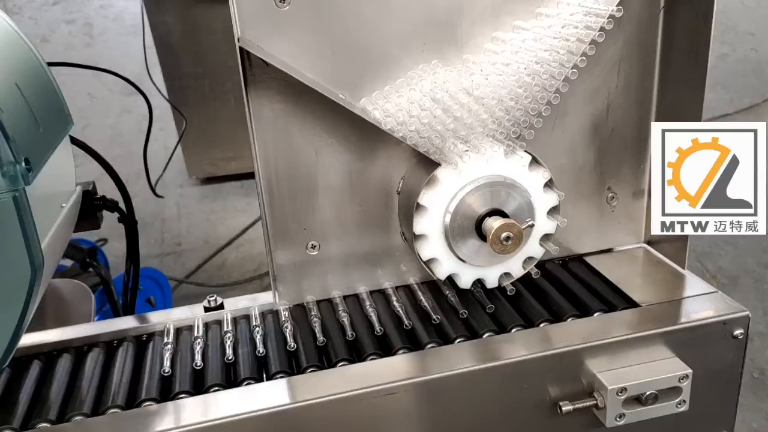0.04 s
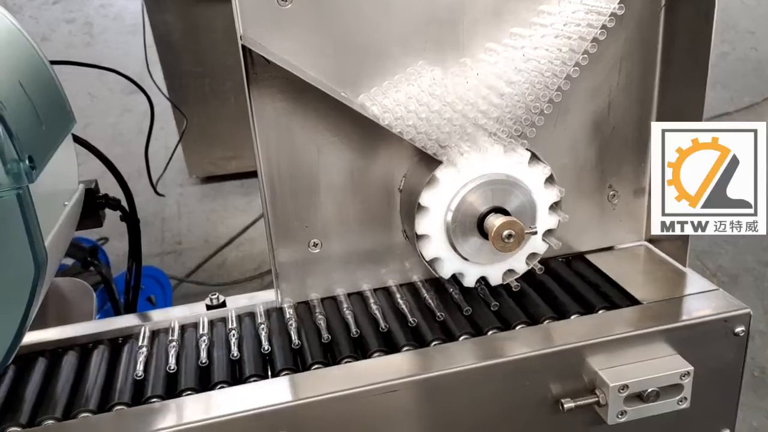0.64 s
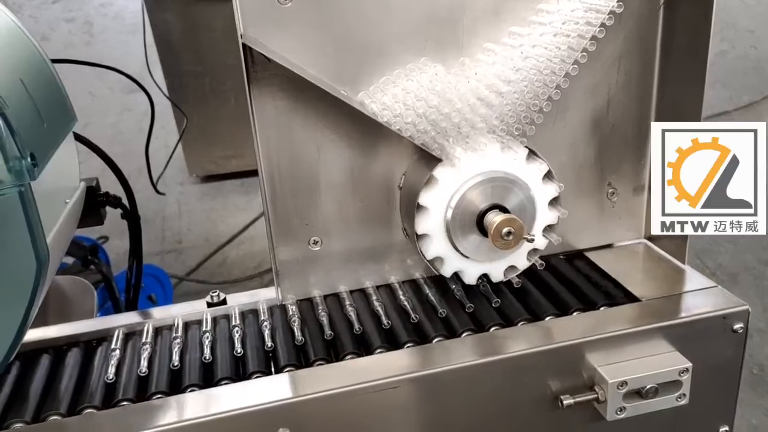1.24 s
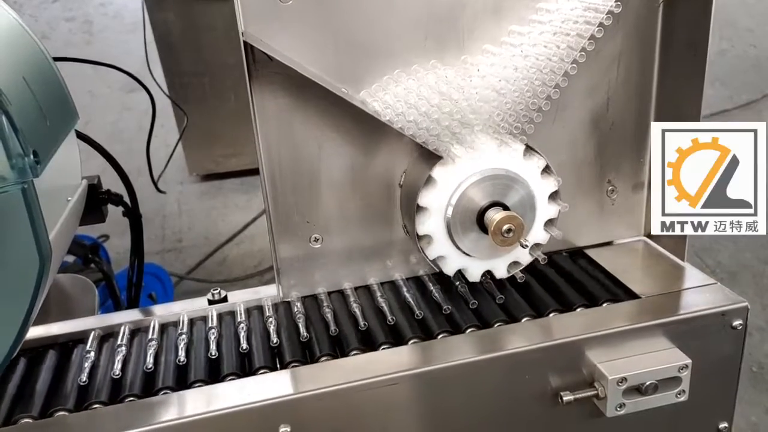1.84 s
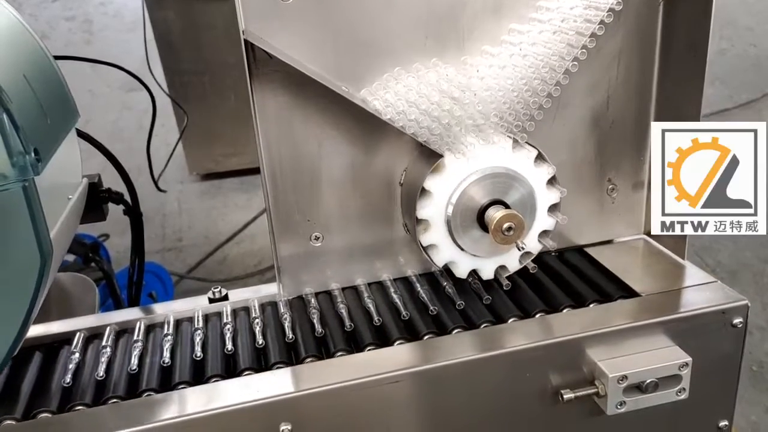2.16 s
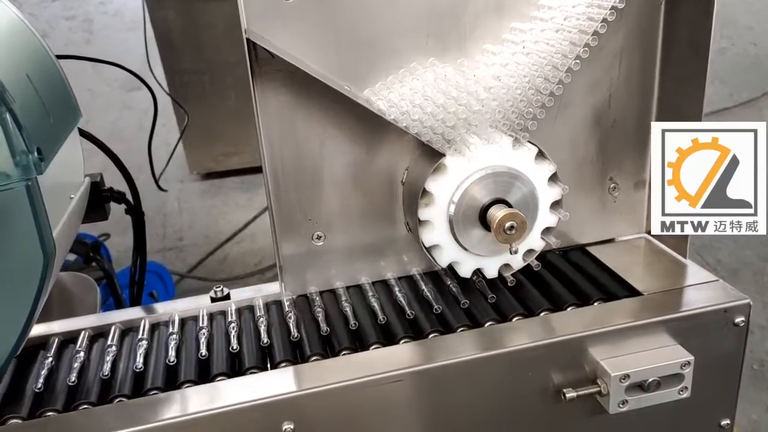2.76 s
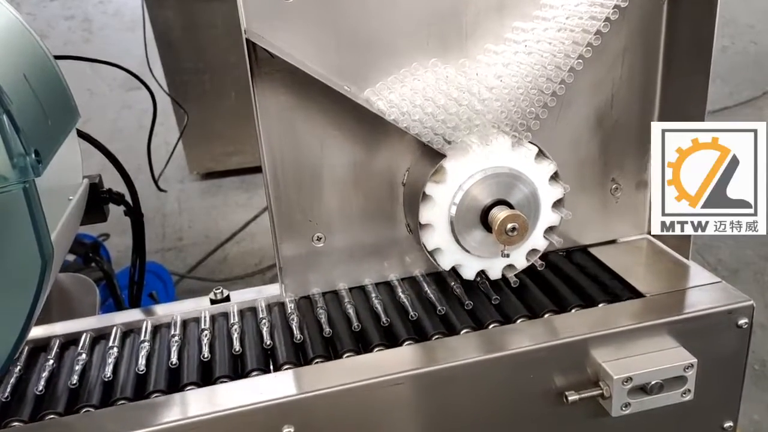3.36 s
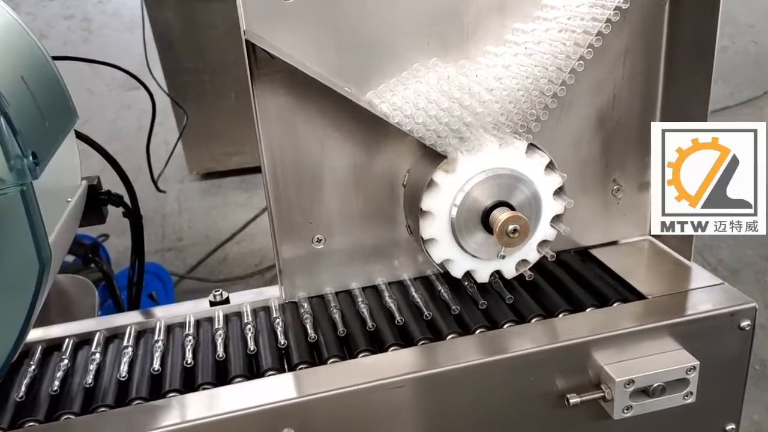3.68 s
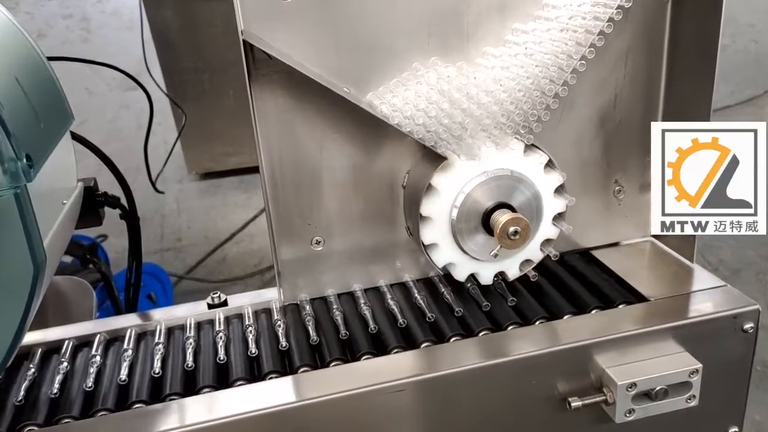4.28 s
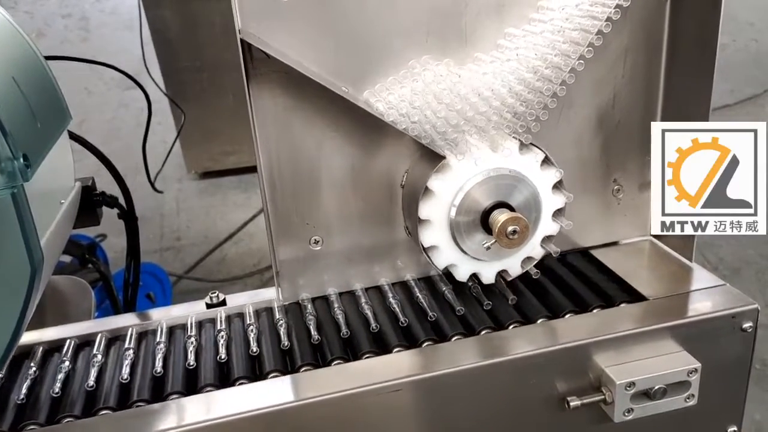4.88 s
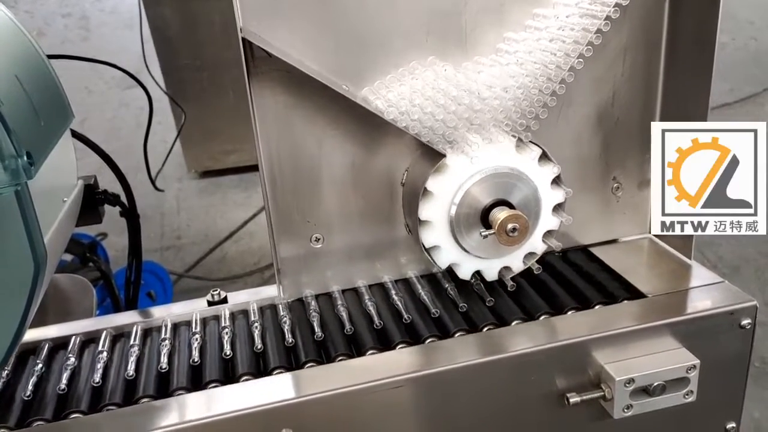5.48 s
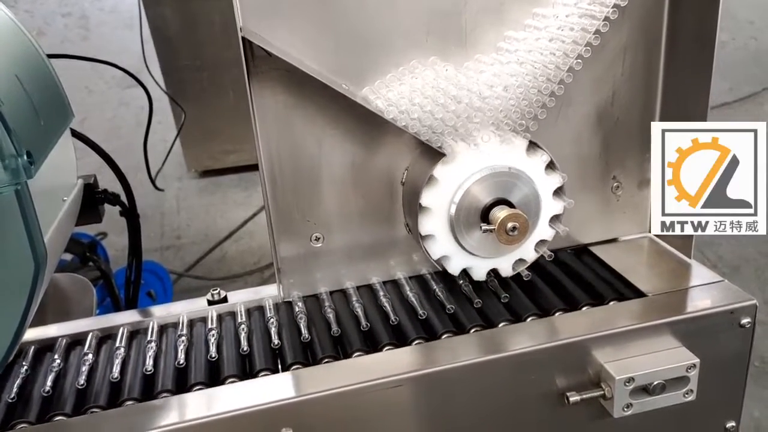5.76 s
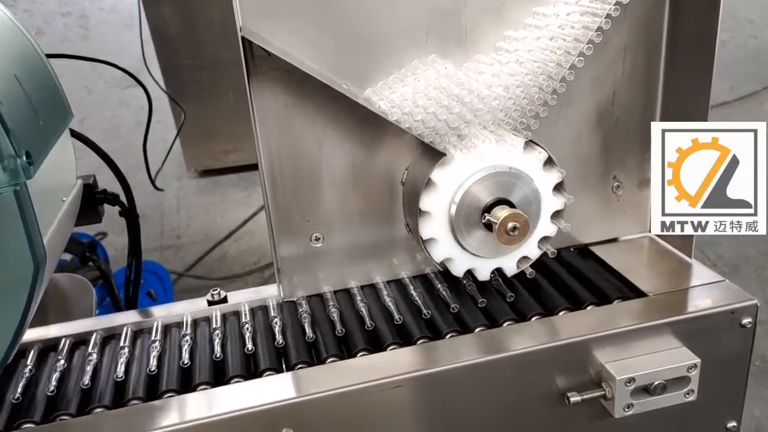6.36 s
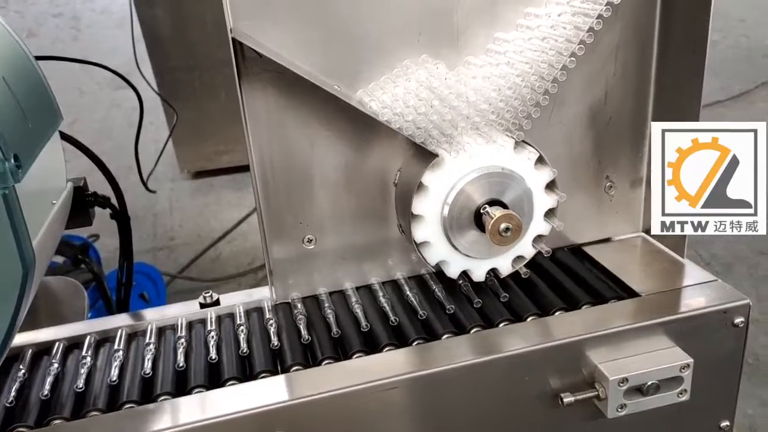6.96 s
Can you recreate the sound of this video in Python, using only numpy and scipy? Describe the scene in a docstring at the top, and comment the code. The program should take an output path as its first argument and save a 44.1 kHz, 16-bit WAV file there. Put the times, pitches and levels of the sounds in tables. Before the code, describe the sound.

A steady factory machine hum and whir fades in, with a few brief air pops on the microphone. Small glass bottles then drop from a feed wheel onto rollers, three or four a second, each with a bright, high clink and quick bounces. Between drops, the bottles piled in a steel bin knock and rattle, and now and then a steel rail rings. The sound is close and continues to the end.

```python
"""A factory hum and whir fades in with a few pops of air on the microphone; then glass starts to clink.
A labeling machine's notched wheel drops small bottles onto rollers, three or four a second.
Each one clinks, bounces and may ring the steel guide rail. Every drop, and every knock among
the bottles piled in the steel hopper (the supply bin), sets that pile rattling until it settles.
The motor runs evenly, but an automatic volume control turns everything down under each loud clink."""
import sys
import numpy as np
from scipy import signal
from scipy.fft import rfft, irfft, next_fast_len
from scipy.io import wavfile
from scipy.ndimage import map_coordinates

SR = 44100
rng = np.random.default_rng(int(sys.argv[2]) if len(sys.argv) > 2 else 0)


def log_audio(samples):
    """Write samples as a 16-bit WAV file to the path given in sys.argv[1]."""
    # one column per channel
    frames = np.atleast_2d(samples).T
    # limit to full scale, then quantise
    limited = np.clip(frames, -1, 1)
    pcm = np.round(limited * 32767).astype(np.int16)
    wavfile.write(sys.argv[1], SR, pcm)


N = 314433
SIDES = np.array([[1], [-1]])  # plus for the left channel, minus for the right


def amp(db):
    """Turn decibels into a number to multiply by."""
    return 10 ** (np.asarray(db) / 20)


def unit(x):
    """Scale a sound to an average (rms) strength of 1."""
    return x / np.sqrt(np.mean(x ** 2) + 1e-20)


def along(points, hz):
    """Read between (Hz, value) points on a logarithmic frequency scale."""
    point_hz, values = np.transpose(points)
    return np.interp(np.log(hz + 1), np.log(point_hz + 1), values)


def curve(rows):
    """Join (seconds, value) points with straight lines, one value per sample."""
    return np.interp(np.arange(N) / SR, *np.transpose(rows))


def wobble(per_s):
    """A smooth curve through per_s random values a second."""
    points = rng.standard_normal(int(N * per_s / SR) + 4)
    return map_coordinates(points, [np.arange(N) * per_s / SR])


def filtered(x, response):
    """Multiply each frequency in a sound by response(hz)."""
    size = x.shape[-1]
    padded = next_fast_len(size + 2048)
    return irfft(rfft(x, padded) * response(np.fft.rfftfreq(padded, 1 / SR)), padded)[..., :size]


def coloured(x, tone):
    """Shape a sound's tone with (Hz, dB) points."""
    return filtered(x, lambda hz: amp(along(tone, hz)))


def burst(t60, size):
    """Stereo noise that dies away; t60 is the fade time, the seconds it takes to fall 60 dB."""
    noise = rng.standard_normal((2, size)) * amp(-60 * np.arange(size) / SR / t60)
    return noise / np.linalg.norm(noise, axis=1, keepdims=True)


def rise(rise_s, size):
    """A soft start that climbs from 0 towards 1."""
    return 1 - np.exp(-np.arange(size) / SR / rise_s)


def scrape(t60, rise_s, size):
    """A scraping contact: noise that builds up, then dies away."""
    return burst(t60, size) * rise(rise_s, size)


def ringing(notes, scatter_db, size):
    """A struck object's fading notes, from (Hz, dB, fade time) rows; every blow mixes them anew."""
    t = np.arange(size) / SR
    return sum(amp(db + rng.normal(0, scatter_db) - 60 * t / t60) * np.sin(2 * np.pi * hz * t)
               for hz, db, t60 in notes)


def resonance(hz, note_hz, width_hz):
    """How steel answers each frequency: most strongly at its own note."""
    return 1j * hz * width_hz / (note_hz ** 2 - hz ** 2 + 1j * hz * width_hz)


def echoed(x, t60, wet_db):
    """Add a smooth tail of echoes, at level wet_db."""
    tail = signal.fftconvolve(np.atleast_2d(x), burst(t60, SR // 3), axes=1)
    return x + amp(wet_db) * tail[:, :x.shape[-1]]


def add(track, start_s, sound):
    """Mix a sound into a track at the given time."""
    part = track[:, round(start_s * SR):][:, :sound.shape[1]]
    part += sound[:, :part.shape[1]]


# How loud the conveyor rumbles. Each row: time in seconds, level in dB.
RUMBLE_LEVELS = [(0.4, -50), (1.7, -49.5), (2.5, -49.5), (3.3, -47), (4.18, -46.5), (4.29, -41),
                 (4.36, -47), (4.8, -47), (5.6, -47.5), (7.1, -48)]

def rumble(frame_hz=331.3, width_hz=60.3, throb_db=1.7):
    """The rolling chain throbs in the conveyor's frame, almost alike on the left and right."""
    noise = rng.standard_normal(N) + 0.34 * rng.standard_normal((2, N))
    body = filtered(noise, lambda hz: np.exp(-((hz - frame_hz) / width_hz) ** 2 / 2))
    return unit(body * amp(throb_db * wobble(30))) * amp(curve(RUMBLE_LEVELS))


# The tone of the whir. Each row: frequency in Hz, level in dB.
WHIR_TONE = [(25, -25), (60, -14), (100, -3), (220, -7), (350, -3.5), (470, -5.5), (950, -6), (1300, -2.5),
             (1550, -3.5), (2100, -1), (2800, -4), (3500, -16), (6000, -22.5), (16000, -74)]
# How alike its two sides are. Each row: frequency in Hz, likeness (1 means the same).
WHIR_LIKENESS = [(50, 0.87), (250, 1), (500, 0.4), (1000, 0.13), (4000, 0.22)]

def whir(level_db=-39, grain_db=1.7):
    """The chain and rollers make an even, slightly grainy rush."""
    def split(hz):
        angle = np.arccos(np.clip(along(WHIR_LIKENESS, hz), -1, 1)) / 2
        return np.array([np.cos(angle), np.sin(angle)])

    noise = coloured(rng.standard_normal((2, N)), WHIR_TONE)
    shared, opposite = filtered(noise, split)
    return unit(shared + SIDES * opposite) * amp(level_db) * amp(grain_db * wobble(80))


# The notes of the motor and gears. Each row: pitch in Hz, level in dB.
MOTOR_NOTES = [(120, -68.5), (180, -52.5), (200, -65.5), (300, -56.5), (360, -53.5), (400, -61),
               (540, -57.5), (720, -60.5), (1238, -62.5), (1272, -58), (1641, -66), (2336, -62),
               (2905, -63.5), (2940, -65), (3454, -70)]

def motor_hum(level_db=5, waver_db=1.2, flutter_db=1.1, drift_rad=0.25):
    """Under a steady load, the motor and gears hold notes that waver only a little."""
    out, t = np.zeros((2, N)), np.arange(N) / SR
    for hz, db in MOTOR_NOTES:
        phase = 2 * np.pi * (hz * t + rng.random()) + drift_rad * wobble(6)
        apart = SIDES * min(hz / 1500, np.pi / 4)  # short waves reach the two sides out of step
        strength = amp(db + level_db + waver_db * wobble(4.03) + flutter_db * wobble(35))
        out += strength * np.sqrt(2) * np.sin(phase + apart)
    return out


# Puffs of air on the microphone. Each row: start in seconds, level in dB.
AIR_POPS = [(0.1815, -9.5), (0.1921, -19.5), (0.3435, -8), (1.0286, 8.5)]

def air_pops(fall_s=0.0022, rise_s=0.00008, left_db=-24, low_cut_hz=76):
    """Air hits the right side of the microphone: the pressure jumps, then swings back below zero."""
    out, size = np.zeros((2, N)), SR // 30
    fall = np.arange(size) / SR / fall_s
    push = (1 - fall) * np.exp(-fall) * rise(rise_s, size)
    for start_s, db in AIR_POPS:
        add(out, start_s, amp([[left_db], [0]]) * amp(db) * push)
    return filtered(out, lambda hz: hz ** 2 / (hz ** 2 + low_cut_hz ** 2))


def stirring(rest_db=-52, knock_db=-14.5, drop_db=-31, drop_settle_s=0.088, restless_db=2):
    """How hard the pile moves: every knock and drop stirs it, then it settles to a faint patter."""
    power, t = np.full((1, N), amp(rest_db) ** 2), np.arange(SR // 2) / SR
    jolts = [(start_s, db + knock_db, settle_s) for start_s, db, _, settle_s, *_ in PILE_KNOCKS]
    jolts += [(start_s, db + drop_db, drop_settle_s) for start_s, db, *_ in BOTTLE_DROPS]
    for start_s, db, settle_s in jolts:
        motion = amp(db) * rise(0.0077, len(t)) * np.exp(-t / settle_s)
        add(power, start_s, motion[None] ** 2)
    return np.sqrt(power[0]) * amp(restless_db * wobble(40))


# The tone of glass against the steel hopper. Each row: frequency in Hz, level in dB.
HOPPER_TONE = [(200, -16), (900, -5.5), (1500, 1.5), (2100, 8), (3200, 2.5), (5000, -3), (5700, 2),
               (7100, -1), (7750, 12.3), (8500, 1), (10000, -15), (13800, -32.5), (14900, -12),
               (16000, -35)]

def pile_patter(level_db=5.5, touches_per_s=700, spread_db=4, touch_s=0.0019):
    """The wheel stirs the pile: a dense patter of tiny, soft touches of glass."""
    happens = rng.random(N) < touches_per_s / SR
    touches = happens * amp(spread_db * np.clip(rng.standard_normal(N), -2, 2))
    rubbing = signal.lfilter([1], [1, -np.exp(-1 / (SR * touch_s))], touches)  # each touch dies away
    noise = rng.standard_normal((2, N)) + 0.77 * rng.standard_normal(N)  # partly alike on both sides
    patter = coloured(rubbing * noise, HOPPER_TONE)
    softened = coloured(patter, [(8800, 0), (10500, -3.5)])
    return echoed(unit(softened) * stirring() * amp(level_db), t60=0.28, wet_db=-3.5)


# The notes of the hopper's walls. Each row: pitch in Hz, width in Hz, level in dB.
WALL_NOTES = [(800, 84, 10.5), (1220, 106, 2), (2320, 1300, -5), (3495, 42, 3.5), (3880, 140, 3),
              (4390, 190, -0.5), (5620, 180, -1), (6440, 290, 0.5)]

def hopper_walls(inside, ring_db=-2):
    """The hopper's sheet steel rings along with whatever moves inside it."""
    def steel(hz):
        return sum(amp(db) * resonance(hz, note_hz, width_hz) for note_hz, width_hz, db in WALL_NOTES)

    return filtered(inside, lambda hz: 1 + amp(ring_db) * steel(hz))


def chinks(size, count=4, spread_s=0.022, low_hz=7260, high_hz=8600, t60=0.022):
    """Jostled neighbours chink one after another, each at its own pitch; later ones are softer."""
    out, t = np.zeros((2, size)), np.arange(size) / SR
    for delay, pitch, right_phase in rng.random((count, 3)):
        hz = low_hz + pitch * (high_hz - low_hz)
        note = np.sin(2 * np.pi * hz * t + np.array([[0], [right_phase]]))
        add(out, delay * spread_s, note * amp(-60 * t / t60) * np.exp(-delay))
    return out


# The hollow part of a knock. Each row: multiple of its pitch, level in dB, fade time in seconds.
CLACK_NOTES = [(.86, -2, 0.055), (1, 1.5, 0.065), (1.14, 2, 0.037), (1.45, -5.5, .045), (2.6, -6.5, 0.043)]

def clack(note_hz, size, rise_s=0.004, detune=0.0402):
    """A few short, hollow notes whose pitch depends on where the hopper is struck."""
    notes = [(note_hz * ratio * (1 + rng.normal(0, detune)), db, t60) for ratio, db, t60 in CLACK_NOTES]
    ring = ringing(notes, scatter_db=5, size=size) * rise(rise_s, size)
    ring = echoed(ring, t60=0.025, wet_db=-3)
    return ring / ring[:, :SR // 100].std()  # strength 1 over the first 10 ms


# Bottles knocking in the pile. Each row: start in seconds, level in dB, glassy treble in dB,
# settling time in seconds, rise time in seconds, hollow pitch in Hz, steely edge in dB.
PILE_KNOCKS = [(0.5417, -24, -5, 0.035, .002, 2285, 1), (.576, -27, -15, 0.022, .002, 2040, -5),
               (.6405, -21.5, -9.5, 0.034, .001, 2245, -11), (.6973, -24, 0, 0.022, .001, 2470, -2),
               (.9522, -27, -24, 0.045, .005, 2340, -7), (1.1885, -23.5, -3, 0.039, 0.0022, 2340, 11),
               (1.2216, -18.5, -5, 0.017, 0.0012, 2057, 7), (1.2855, -24.5, -25, 0.0092, 0.0008, 1985, -6),
               (1.3369, -18, -5.5, 0.022, 0.0038, 2490, 3), (1.3823, -18.5, -3, 0.025, .001, 2415, 4),
               (1.5337, -24, -5, 0.022, 0.00089, 2325, 0), (1.6, -21.5, -15, 0.033, .002, 2480, -10),
               (1.8734, -22, 1, 0.033, 0.0012, 2240, 2), (2.1929, -24, -3, 0.025, 0.0026, 2170, -3),
               (2.2194, -23.5, -5, 0.033, .002, 2300, -2), (2.2767, -19.5, -11, 0.012, 0.0054, 2080, -9),
               (2.4808, -25, -10, 0.044, 0.011, 2266, 0), (2.815, -23.5, -5, 0.042, 0.00048, 2150, -5),
               (3.0495, -23.5, -28, 0.06, .002, 2390, -3), (3.1767, -24.5, -8, 0.014, 0.0013, 2084, -3),
               (3.4808, -18.5, -13.5, 0.015, 0.00066, 1870, 4), (3.56, -20.5, -2, 0.07, .004, 2580, 5.5),
               (3.687, -22.5, -32, .006, .0005, 2595, 2), (3.977, -20.5, -11, 0.066, 0.0054, 1890, -12),
               (4.08, -15.5, -6, 0.028, .005, 2080, 8), (4.2492, -27.5, -13, .09, 0.0012, 2230, 3),
               (4.5206, -18, -4, 0.032, 0.0036, 1880, -1), (4.6175, -20, -8, 0.055, .001, 2475, 4),
               (4.641, -25, 10, .03, 0.0051, 2380, 8), (4.6643, -17.5, -6, 0.034, 0.0034, 2513, 6),
               (4.781, -18, -16, 0.0046, 0.00073, 1997, -5), (4.8254, -28, 1, 0.035, .0007, 2350, 6),
               (4.8688, -17, -6, 0.016, 0.00085, 2610, 1), (4.9263, -22, -9, 0.029, 0.00072, 2260, 7),
               (5.08, -22, -12, .056, .004, 2265, -1), (5.1602, -23, -7, 0.042, .003, 2386, 1),
               (5.274, -29.5, -7, 0.011, 0.00092, 2770, -7), (5.306, -30, -7, .017, .001, 2560, 0),
               (5.4517, -22, -12, 0.029, .0005, 2374, 4), (5.518, -25, -23, .009, 0.0024, 2000, -7),
               (5.5887, -26, -11, 0.017, 0.0028, 2310, 2), (5.8752, -28.5, -7, 0.0095, 0.00092, 2034, 0),
               (6.1873, -26.5, -5, 0.031, .002, 2170, -4), (6.2362, -21.5, 7, 0.061, 0.0011, 2270, 8),
               (6.2766, -20.5, 1, 0.058, 0.0011, 2280, 3), (6.5455, -30, -19, 0.019, .005, 1910, -10),
               (6.67, -24.5, -5, 0.066, 0.013, 2576, -3), (6.8159, -19.5, 4.5, 0.025, .003, 1893, 3),
               (6.875, -27, -14, 0.02, .004, 2150, -7), (6.9276, -23, -9, 0.042, .001, 1950, -4),
               (7.063, -28.5, -32, 0.021, .003, 2080, -3), (7.109, -26, -25, 0.022, .004, 2026, -7)]

def knocks(level_db=-7.5, uneven_db=3, clack_db=-6.5, chink_db=-1):
    """A bottle slips in the pile: a hollow, scraping knock and a clatter; harder knocks are brighter."""
    out, size = np.zeros((2, N)), SR // 5
    usual_db = np.mean([db for _, db, *_ in PILE_KNOCKS])
    for start_s, db, treble_db, settle_s, rise_s, note_hz, edge_db in PILE_KNOCKS:
        jolts = amp(uneven_db * np.repeat(rng.uniform(-1.7, 1.7, size // 60), 60))
        clatter = scrape(t60=0.046 + settle_s, rise_s=0.0026 + rise_s, size=size) * jolts
        hit = coloured(scrape(t60=0.022, rise_s=rise_s, size=size) + clatter, HOPPER_TONE)
        hit = hit / hit[:, :SR // 100].std() + amp(chink_db) * chinks(size)
        glassy_db = 0.64 * (treble_db + 12)
        splash_db = 6 + db - usual_db
        tone = [(4800, 0), (5700, edge_db), (6600, edge_db), (7200, glassy_db / 2),
                (8000, glassy_db), (9000, glassy_db), (11000, glassy_db + splash_db)]
        knock = coloured(hit, tone) + amp(clack_db) * clack(note_hz, size)
        add(out, start_s, amp(db + level_db) * knock)
    return echoed(out, t60=0.11, wet_db=-4.5)


# Light touches on steel. Each row: start in seconds, level in dB, pitch in Hz.
STEEL_TINGS = [(2.927, -32, 4020), (3.022, -28, 3461), (3.092, -35, 3520), (4.38, -32, 3450),
               (5.735, -33, 3467), (5.79, -32.5, 3100), (6.335, -28, 3494), (7.06, -35, 3628)]

def tings(level_db=-7, t60=0.12, width_hz=80, grit_db=-11):
    """A bottle nudges a steel part: a gritty touch with a short note in it."""
    out, size = np.zeros((2, N)), SR // 6
    for start_s, db, note_hz in STEEL_TINGS:
        nudge = scrape(t60, rise_s=0.001, size=size)
        note = filtered(nudge, lambda hz: resonance(hz, note_hz, width_hz))
        grit = coloured(burst(t60=0.015, size=size), CONTACT_TONE)
        ting = note / np.linalg.norm(note[0]) + amp(grit_db) * grit
        add(out, start_s, amp(db + level_db) * ting / ting[:, :SR // 100].std())
    return out


# Two bottles touching. Each row: start in seconds, level in dB, pitch in Hz.
GLASS_TICKS = [(0.8393, -17, 7700), (2.817, -20, 7850), (2.83, -18, 8000), (3.351, -29, 8100),
               (3.468, -24, 8000), (3.851, -29, 8030), (4.518, -21, 8200), (4.871, -12.5, 8360),
               (5.452, -27, 7850), (5.466, -19, 8220), (5.613, -28, 8400), (5.642, -26, 7800),
               (5.793, -20, 7950), (6.036, -28, 8030), (6.19, -19, 8000), (6.819, -11, 8000),
               (6.97, -18, 7600), (7.029, -33, 7800)]

def ticks(level_db=-8, t60=0.052, crack_db=15):
    """Wedged in the pile, a bottle gives only a dry crack and a choked ring."""
    out, size = np.zeros((2, N)), SR // 10
    for start_s, db, hz in GLASS_TICKS:
        ring = ringing([(hz, 0, t60)], scatter_db=0.5, size=size)
        tick = ring + amp(crack_db) * coloured(burst(t60=0.012, size=size), CONTACT_TONE)
        add(out, start_s, amp(db + level_db) * tick / tick[:, :SR // 300].std())
    return echoed(out, t60=0.066, wet_db=-2)


# Blows on the steel guide rail. Each row: start in seconds, level in dB.
RAIL_BLOWS = [(.553, -33), (0.6977, -16.5), (1.999, -14), (2.644, -22.5), (3.57, -24), (4.09, -23),
              (4.62, -21), (5.324, -16.5), (6.248, -21)]
# The rail's notes. Each row: pitch in Hz, level in dB, fade time in seconds.
RAIL_NOTES = [(3994, -10, 0.2), (5600, -1, 0.059), (5720, -0.5, 0.16), (6580, -4, 0.11), (9370, -9, .04),
              (11670, -12, 0.045), (13280, -18, .045)]

def guide_rail(level_db=-9, rattle_s=0.005, rattle_gain=0.62):
    """A bottle's neck flips against the loose rail in a quick double touch, and the rail buzzes."""
    out = np.zeros((2, N))
    for start_s, db in RAIL_BLOWS:
        ring = echoed(ringing(RAIL_NOTES, scatter_db=2.5, size=SR // 4), t60=0.05, wet_db=-8)
        add(ring, rattle_s * (0.5 + rng.random()), rattle_gain * ring)
        add(out, start_s, amp(db + level_db) * ring / ring[:, :SR // 100].std())
    buzz = 0.8 + 0.6 * wobble(350)
    return out * buzz


# The tone of glass sliding on the wheel. Each row: frequency in Hz, level in dB.
SLIDE_TONE = [(2000, -16.5), (6800, -5.5), (7750, 0.5), (8600, -14), (10000, -26), (14800, -40),
              (16000, -50)]

def slides(level_db=-24, swell_s=0.011, uneven_db=4):
    """Just before it lands, each bottle grates over the edge of its notch."""
    grip, size = np.zeros((1, N)), SR // 12
    swell = np.exp(-np.arange(size)[::-1] / SR / swell_s)
    for landing_s, db, *_ in BOTTLE_DROPS:
        add(grip, landing_s - size / SR, amp(db + level_db) * swell[None])
    grating = unit(coloured(rng.standard_normal((2, N)), SLIDE_TONE))
    return grating * grip * amp(uneven_db * wobble(250))


# Bottles landing on the rollers. Each row: start in seconds, level in dB, pitch in Hz,
# lean to the left in dB, boost of the lowest note in dB, hardness in dB, free ringing in seconds,
# then for each of two bounces: time in the air in seconds, dB below the landing.
BOTTLE_DROPS = [(0.3627, -7, 7670, 2.5, -8, 1.5, 0.006, 0.023, 7, .0255, .5),
                (.457, -13.5, 7620, 3.5, -8, 2, 0.013, .023, 18, .015, 17),
                (.6883, -18, 7820, 7, 12, 5, 0.0035, .012, 3, .016, 8),
                (1.023, -6.5, 7720, 5.5, -2, 2.5, 0.011, 0.067, 4, .055, 14),
                (1.3461, -2, 7780, 2.5, -4, 0, .011, 0.039, 23, .029, 21),
                (1.6725, -5, 7764, 6, -3, -1.5, 0.03, 0.052, 0.5, .038, 13),
                (1.989, -6.5, 7650, 11, 15, -2, .0069, 0.052, 10, .022, 25),
                (2.2156, -13, 7730, 4, -7, 4, .0042, 0.02, 9, .015, 22),
                (2.3181, -1.5, 7790, 4, -15, 0, 0.007, 0.028, 6.5, .034, 7),
                (2.634, -13, 7690, 8, 9, 5.5, .014, 0.063, 15, .025, 39),
                (2.969, -3, 7680, .5, -6, -3, 0.023, 0.058, 4, .039, 20),
                (3.516, -16.5, 7600, 5, 6, 3, .017, 0.034, 7, .04, 14),
                (3.538, -9, 7940, 1.5, -8, -1, 0.0076, 0.03, 3, .016, 15),
                (3.6259, -5.5, 7940, 6.5, -7.5, 0, 0.0027, 0.033, 5, .0285, 5),
                (3.729, -12.5, 7960, 19, -10, 3, 0.013, .014, 23, .013, 25),
                (3.999, -6, 7720, 1, -3, 0.5, .0027, 0.016, -2, .0075, 5),
                (4.3054, -4.5, 7643, 5.5, -3, 2.5, .0037, 0.048, 9.5, .027, 6),
                (4.9826, -2, 7710, 3, -12, -1.5, 0.021, 0.036, 7.5, .027, 7),
                (5.314, -8.5, 7700, 5.5, 8, -3, 0.0056, .0097, 3, .034, 1.5),
                (5.658, -3.5, 7733, 6.5, 1, 1.5, 0.0196, 0.047, 0.5, .017, 17),
                (6.2382, -7.5, 7700, 2.5, 10, 0.5, 0.011, 0.039, -1, .024, 13),
                (6.3355, -7, 7830, 6, -3, -0.5, 0.0089, .027, 0, .019, 5),
                (6.4324, -15, 7750, 7.5, -2, -2, 0.019, .02, 12, .028, 8.5),
                (6.7048, -10.5, 7750, 7, -13, -1, .0082, .01, -3, .0095, -7.5),
                (6.7466, -8, 7670, 9, -2, -1, .007, .02, 3, .021, 8),
                (6.987, -4.5, 7680, 9.5, -4, -2, 0.016, .045, 5, .026, 28)]

def landings_and_bounces(bounce_ring_s=0.016):
    """Each bottle meets the rollers three times: it lands, then bounces twice."""
    for start_s, db, hz, left_db, low_db, hard_db, free_s, *bounces in BOTTLE_DROPS:
        first_s, first_loss_db, second_s, second_loss_db = bounces
        bounce_sound = (hz, left_db, min(low_db, 0), hard_db, bounce_ring_s)
        yield start_s, db, hz, left_db, low_db, hard_db, free_s
        yield start_s + first_s, db - first_loss_db, *bounce_sound
        yield start_s + first_s + second_s, db - second_loss_db, *bounce_sound


# A bottle's notes, main ring first. Each row: pitch in Hz, level in dB, fade time in seconds.
BOTTLE_NOTES = [(7930, -0.5, 0.11), (7570, -25, 0.042), (6440, -13.5, 0.015), (8040, -16.5, 0.036),
                (14800, -27.5, 0.1)]

def bottle_ring(pitch_hz, low_db, free_s, size, grip_db=6.5, grip_s=0.00086, rise_s=0.00048):
    """Struck glass rings freely for free_s seconds, until a roller's grip quietens it."""
    notes, main_hz = [], BOTTLE_NOTES[0][0]
    for index, (hz, db, t60) in enumerate(BOTTLE_NOTES):
        # only the first two notes follow this bottle's own pitch
        tuning = pitch_hz / main_hz if index < 2 else 1 + rng.normal(0, 0.005)
        notes.append((hz * tuning, db + low_db * (hz < 7000), t60))
    ring = ringing(notes, scatter_db=2.5, size=size) * rise(rise_s, size)
    gripped = (1 + np.tanh((np.arange(size) / SR - free_s) / grip_s)) / 2
    return ring * amp(-grip_db * gripped)


# The tone of the crack as glass meets a roller. Each row: frequency in Hz, level in dB.
CONTACT_TONE = [(200, -20), (1000, -24), (2200, 6), (4800, 2.5), (6500, 3), (7800, 18), (8600, 2.5),
                (10000, -10.5), (14800, -46), (16000, -34)]

def clinks(level_db=-4.6, crack_db=4.6, chatter_gain=0.28, chatter_s=0.028):
    """A bottle hits a roller with a crack and a ring; it chatters, and the steel walls echo."""
    out, size = np.zeros((2, N)), SR // 4
    usual_left_db = np.mean([left_db for _, _, _, left_db, *_ in BOTTLE_DROPS])
    for start_s, db, pitch_hz, left_db, low_db, hard_db, free_s in landings_and_bounces():
        ring = bottle_ring(pitch_hz, low_db, free_s, size)
        crack_gain = amp(crack_db + hard_db)
        clink = ring + crack_gain * coloured(scrape(t60=0.03, rise_s=0.00029, size=size), CONTACT_TONE)
        for delay, strength in rng.random((3, 2)):  # three light touches feed or weaken the ring
            touch = ring + crack_gain * coloured(burst(t60=0.024, size=size), CONTACT_TONE)
            add(clink, 0.0065 + chatter_s * delay, chatter_gain * strength * touch)
        clink = echoed(clink, t60=0.23, wet_db=-10.5)
        clink /= clink[:, :SR // 200].std(1, keepdims=True)  # strength 1 over the first 5 ms
        pan_db = SIDES * (left_db - usual_left_db) / 2
        add(out, start_s, amp(db + level_db + pan_db) * clink)
    return out


# The microphone's uneven sides. Each row: frequency in Hz, how much louder the left is in dB.
LEFT_BOOST = [(60, 0), (300, 0), (1000, 1.5), (2400, -4.5), (5800, -5.5), (7000, -7.5), (7700, 11),
              (8600, 15.5), (10000, -0.5), (13000, -8), (14900, 3)]
# The microphone fading in. Each row: time in seconds, level in dB.
FADE_IN = [(0.155, -92), (0.16, -14.5), (0.215, -21), (0.24, -6), (0.32, -3)]

def microphone(sound, left_lag_s=0.000017):
    """The microphone fades in; each side has its own tone, and sound reaches the right side first."""
    def response(hz):
        balance = amp(SIDES * along(LEFT_BOOST, hz) / 2)
        delay = np.exp(-1j * np.pi * SIDES * hz * left_lag_s)
        return balance * delay

    return filtered(sound, response) * amp(curve(FADE_IN))


def volume_control(x, threshold_db=-31.5, cut_per_db=0.44, attack_s=0.0045, release_s=0.04):
    """Loud sound turns the volume down quickly; it comes back more slowly."""
    block = 88  # samples
    power = (x ** 2).mean(0)[:N // block * block].reshape(-1, block).mean(1)
    wanted_cuts_db = cut_per_db * np.maximum(10 * np.log10(power + 1e-12) - threshold_db, 0)
    attack, release = 1 - np.exp(-block / SR / np.array([attack_s, release_s]))
    cuts_db = [0]
    for wanted_db in wanted_cuts_db:
        gap_db = wanted_db - cuts_db[-1]
        cuts_db.append(cuts_db[-1] + gap_db * (attack if gap_db > 0 else release))
    position = (np.arange(N) + 0.00063 * SR) / block  # it looks slightly ahead
    return x * amp(-np.interp(position, np.arange(len(cuts_db)), cuts_db))


def scene():
    """Bottles, hopper and drive as the microphone hears them, plus the pops of air."""
    bottles = clinks() + guide_rail() + ticks() + tings() + slides()
    hopper = hopper_walls(knocks() + pile_patter())
    drive = whir() + motor_hum() + rumble()
    return microphone(bottles + hopper + drive) + air_pops()


def record(dry, top_hz=16300):
    """Turn down the loud moments, then cut off the very highest treble."""
    return filtered(volume_control(dry), lambda hz: hz < top_hz)


dry = scene()
out = record(dry)
log_audio(out)
```